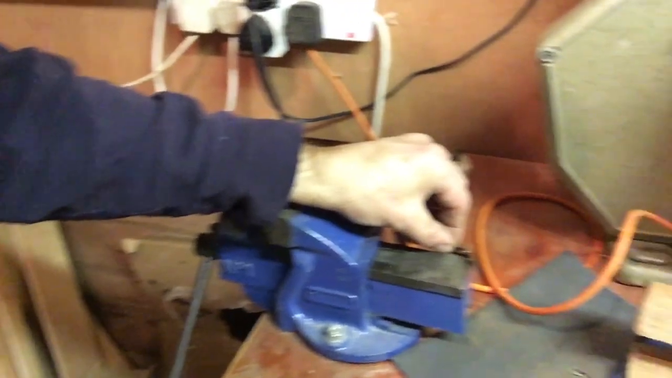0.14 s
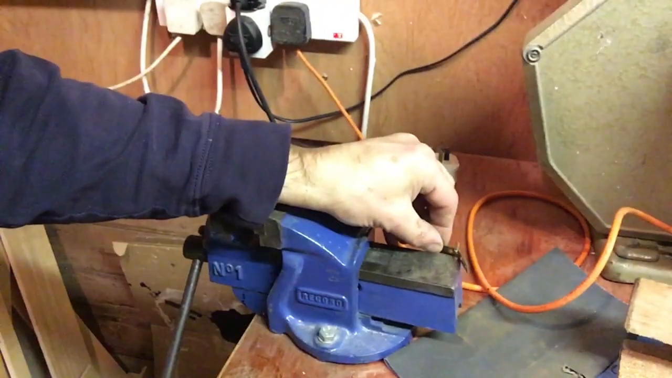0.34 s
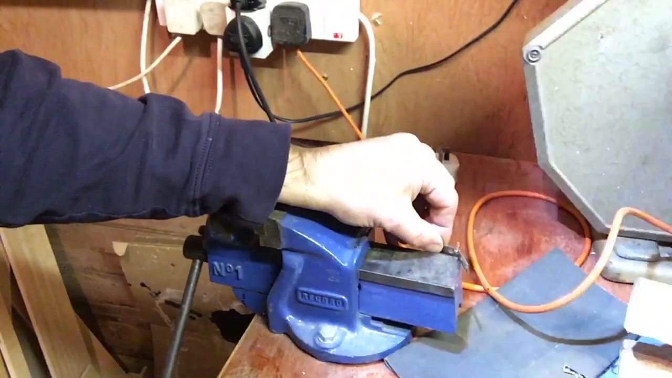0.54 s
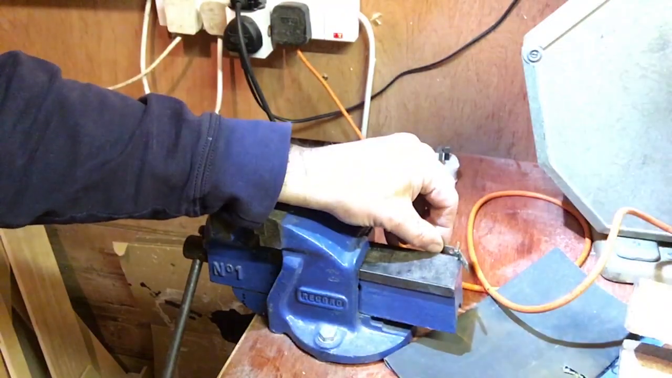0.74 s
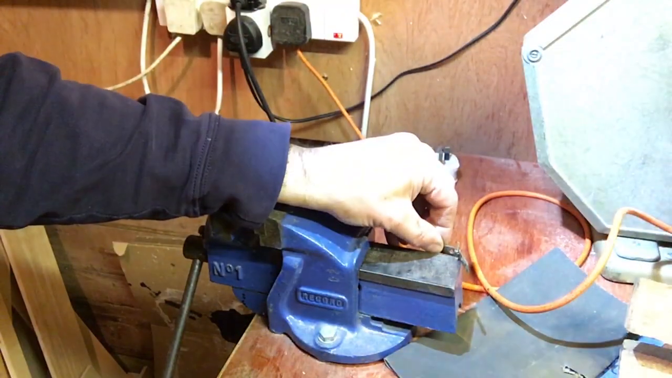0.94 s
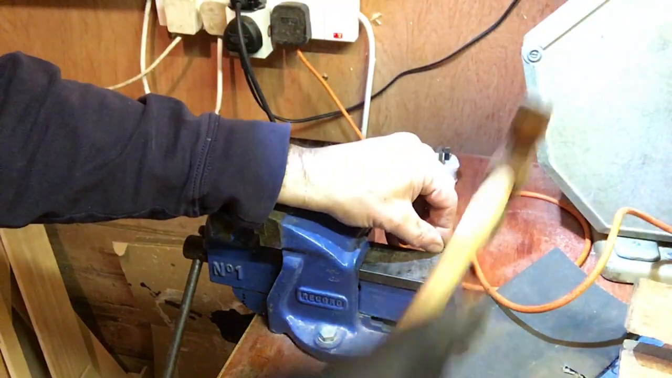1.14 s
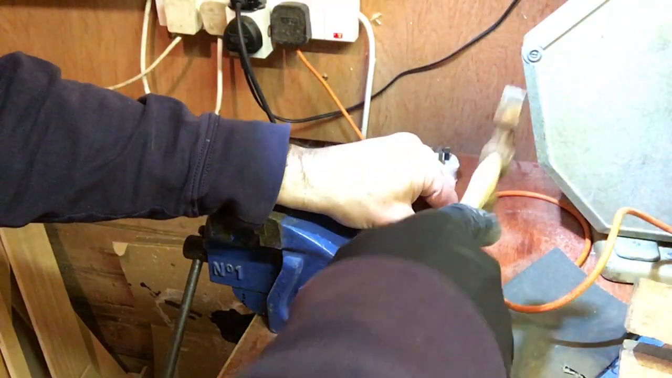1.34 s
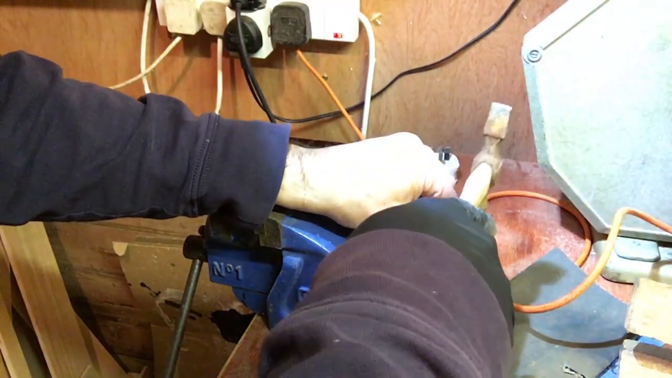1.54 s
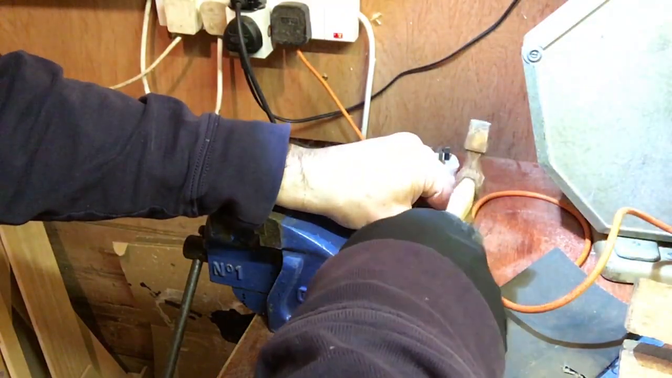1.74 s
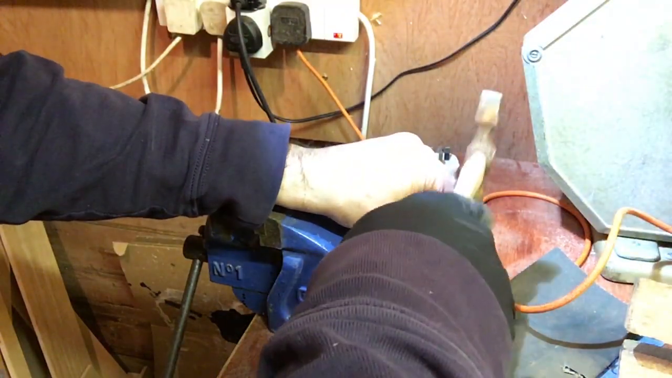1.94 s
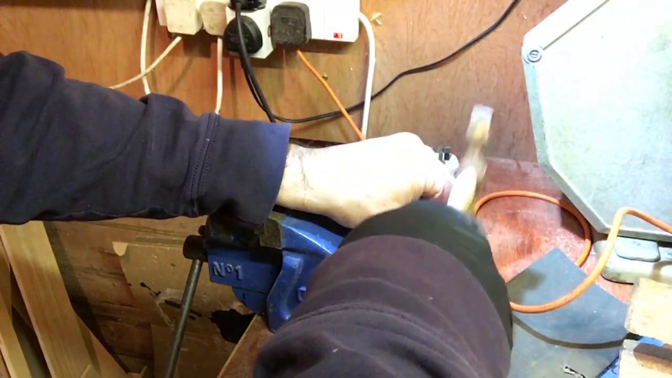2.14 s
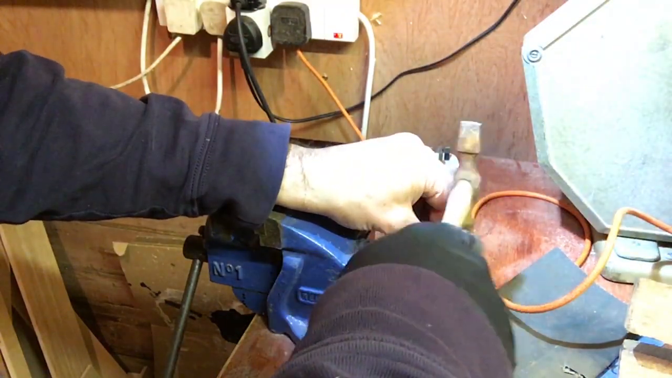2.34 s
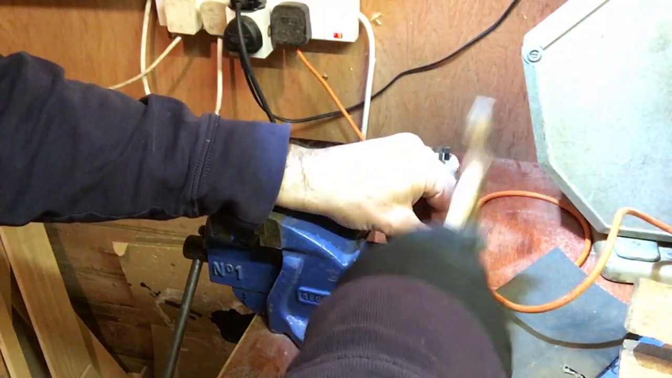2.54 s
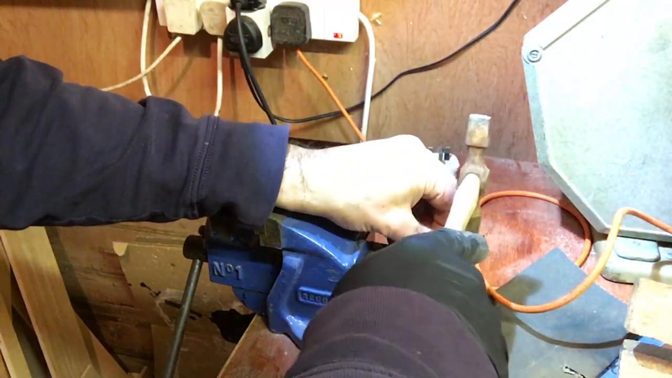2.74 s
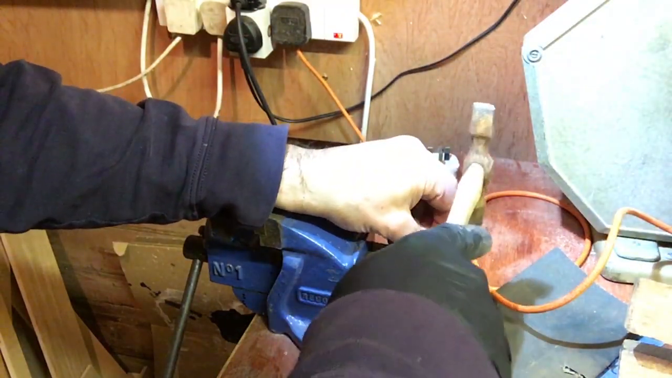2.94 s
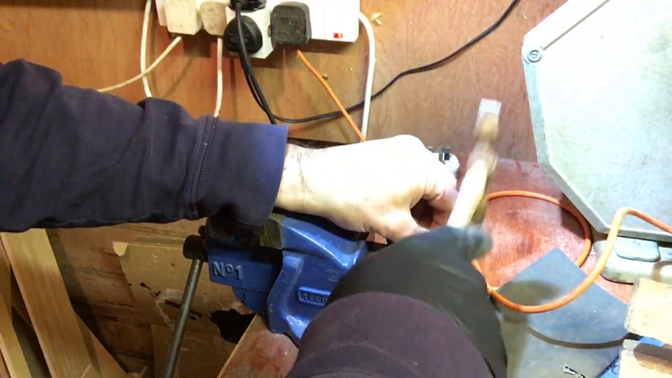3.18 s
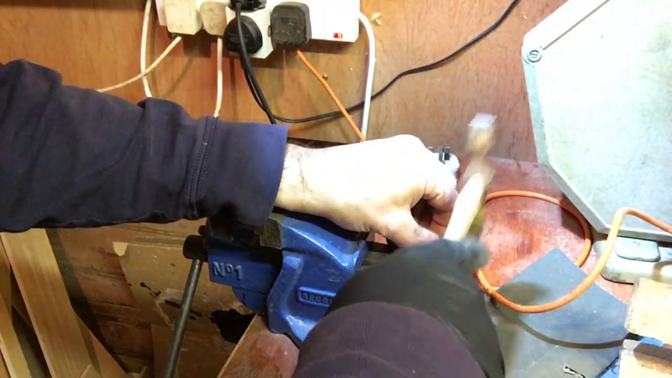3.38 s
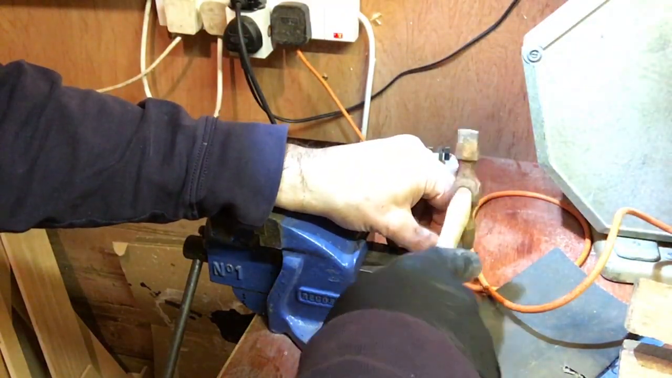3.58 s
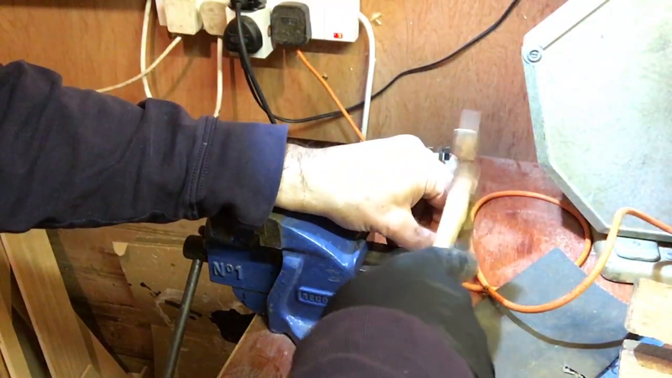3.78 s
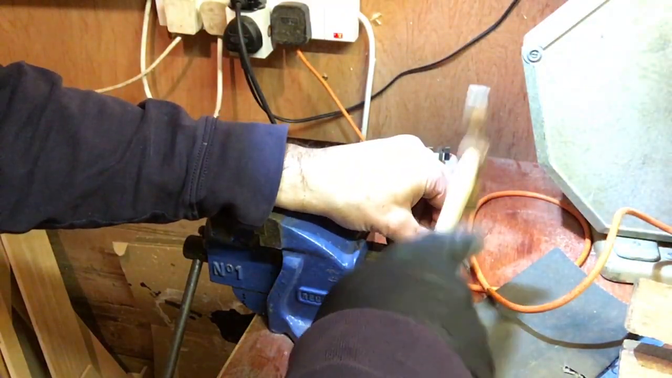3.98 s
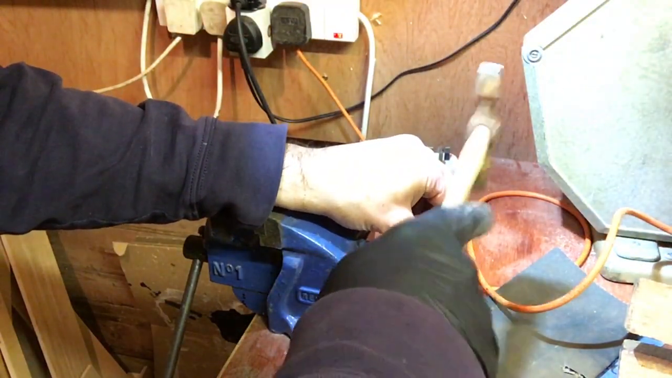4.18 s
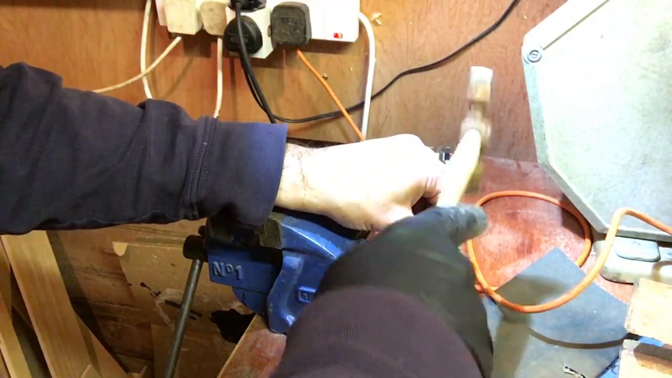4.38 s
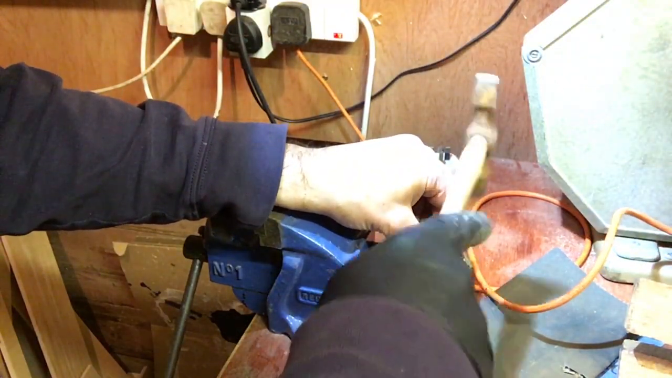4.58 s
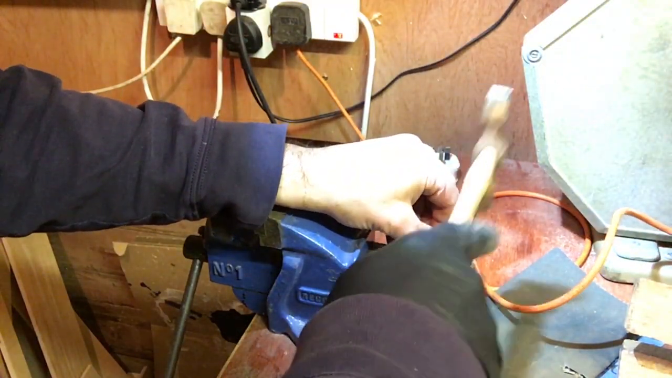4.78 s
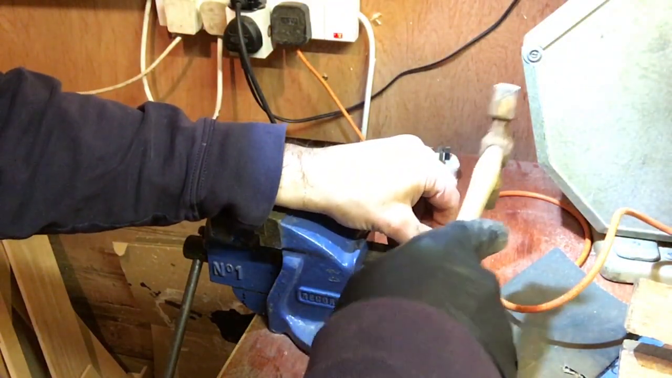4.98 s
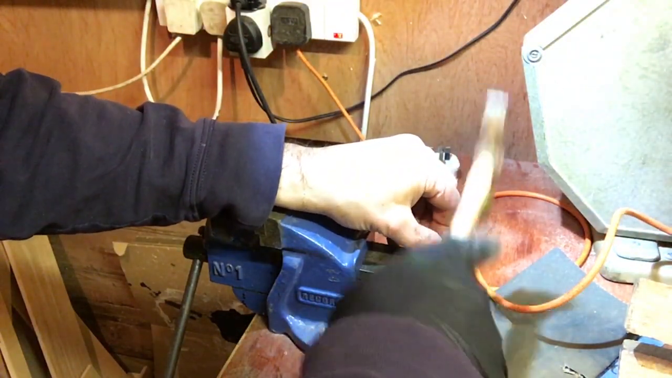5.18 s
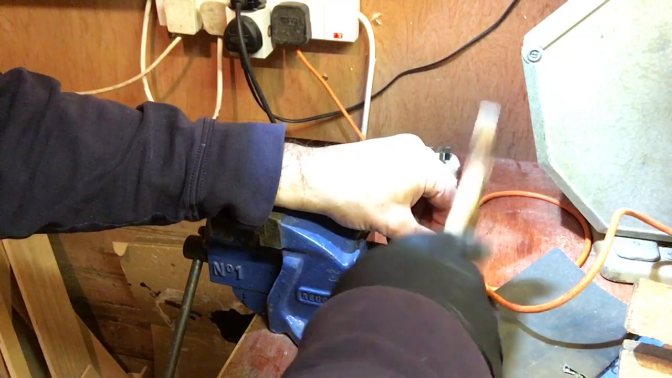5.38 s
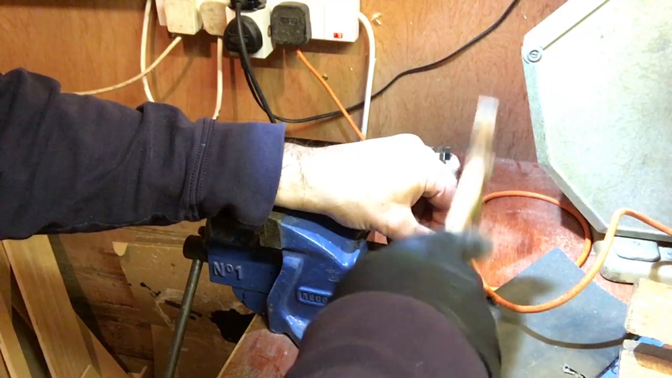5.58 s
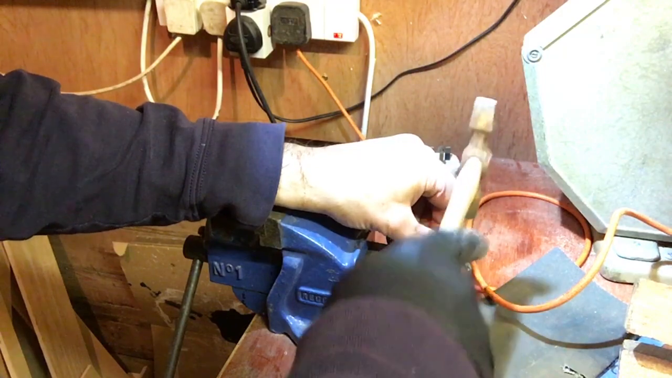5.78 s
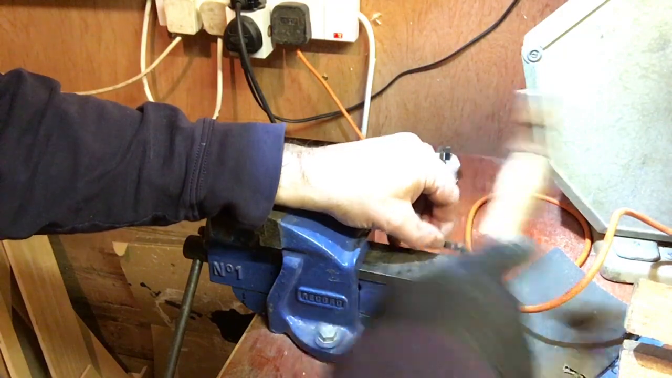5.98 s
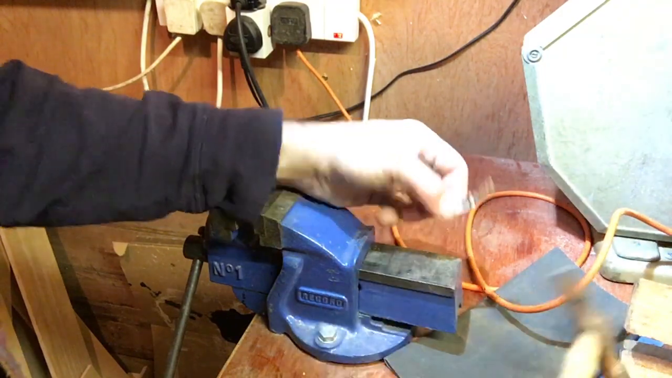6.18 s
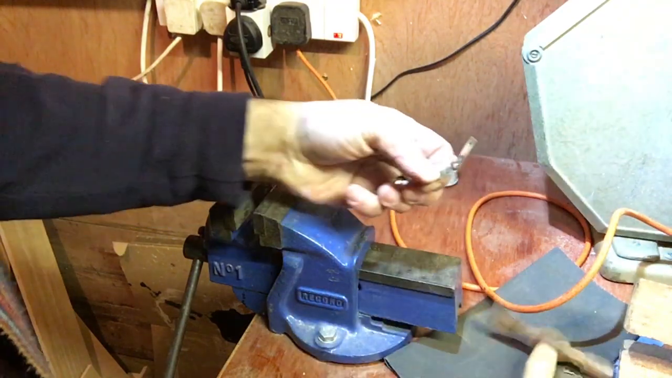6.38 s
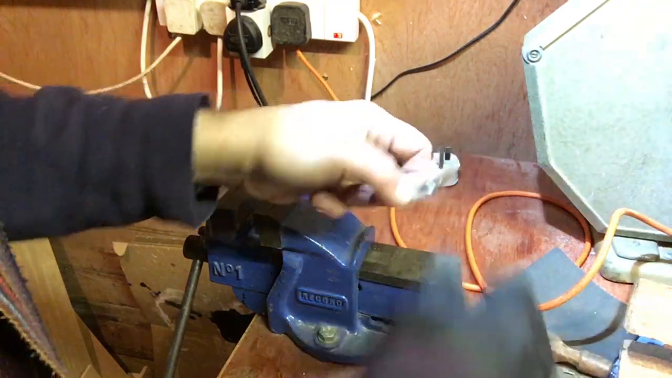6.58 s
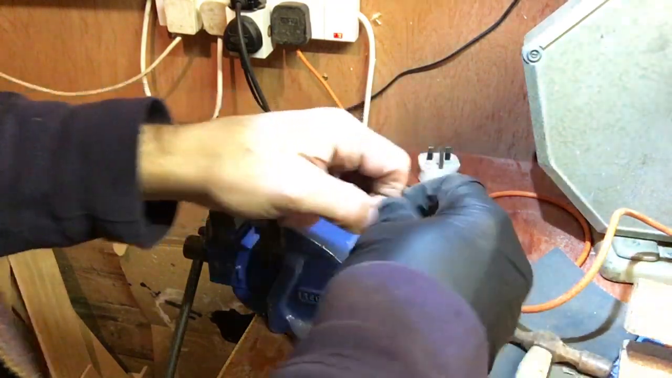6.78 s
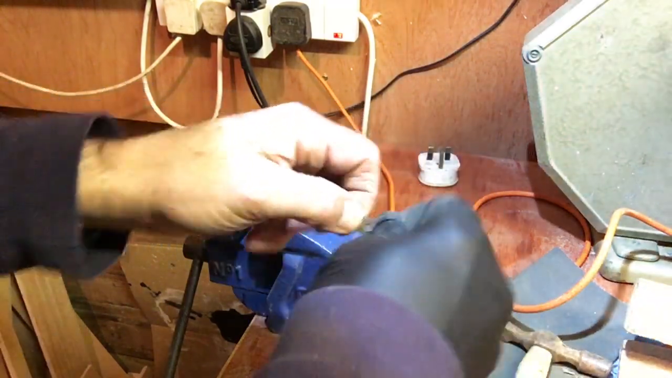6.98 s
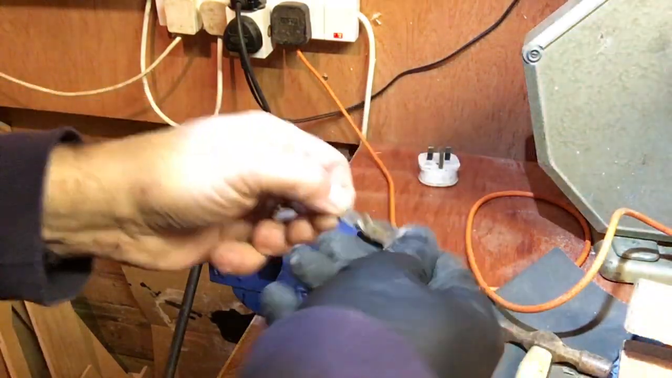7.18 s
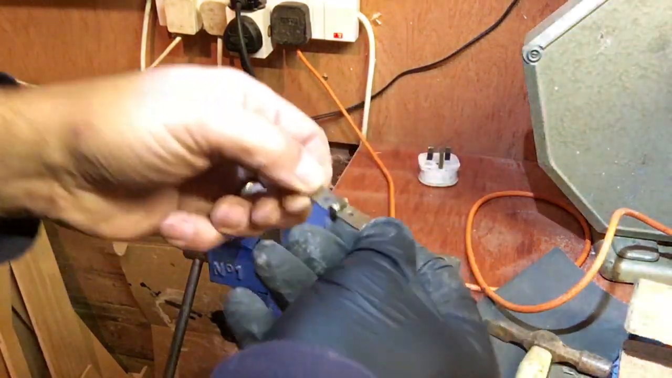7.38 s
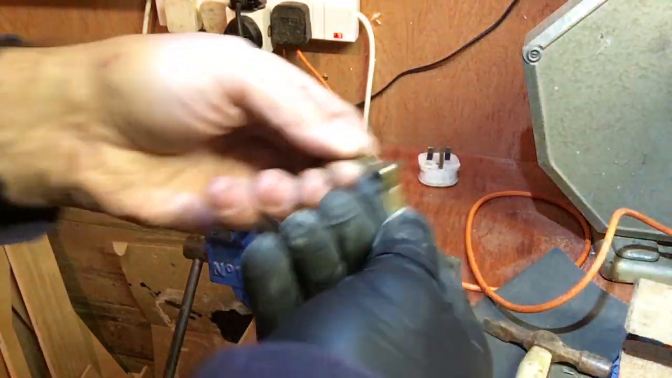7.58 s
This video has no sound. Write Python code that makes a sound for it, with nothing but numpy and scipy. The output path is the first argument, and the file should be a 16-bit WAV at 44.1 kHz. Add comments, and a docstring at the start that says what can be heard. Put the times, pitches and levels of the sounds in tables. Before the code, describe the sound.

Faint cloth rustle, then sharp metallic hammer blows on a vise-held pin, some overloading, followed by a bouncing wooden knock and soft scuffs.

```python
"""A dull hush fades first over a low room rumble that lasts throughout; sleeves and fingers rustle, one tick.
A small hammer then taps a brass hinge pin on an iron vise bolted to a wooden bench, in a small dry workshop.
The hammer is laid down and bounces on the bench; scuffs, ticks and two soft bumps follow.
Hits are click-driven modes plus dense decaying noise; rustle and room are noise shaped in bands.
The microphone is close, and the hard blows overload it."""
import sys
import numpy as np
from scipy import signal
from scipy.io import wavfile

SR = 44100
rng = np.random.default_rng(int(sys.argv[2]) if len(sys.argv) > 2 else 0)


def persist_wave(psi):
    """Save psi, clipped to +-1, as 16-bit WAV."""
    counts = np.round(np.clip(psi, -1, 1) * 32767).astype(np.int16)
    wavfile.write(sys.argv[1], SR, np.atleast_2d(counts).T)


N = 336232

# hammer on pin: t/s, blow level/dB; relative to the blow: bench thud/dB, vise ring/dB, pin clink/dB, bright edge/dB
BLOWS = [(1.726, -18.5, 8, -24.5, -16, -13), (2.039, -9, 9.5, -1, -7.5, -1),
         (2.304, -10.5, 8.5, -6, -19.5, -12.5), (2.561, -18, 11, -0.5, 7, 14.5),
         (3.04, -19, 11.5, -4, 6, 18), (3.296, -4.5, 3, -5.5, -12, -2.5), (3.545, 0, -0.5, -4.1, -7.5, 6),
         (3.778, -1, -0.5, 2, -3, -1), (4.008, -1, -1, 1.5, -4.5, 4), (4.224, -1, 0.5, 2.95, -2, 3.5),
         (4.438, -2, 1.5, 1.2, 0.5, 3.5), (4.627, -4.5, -4, 1.5, -3.5, 9),
         (5.095, -5.5, 5.5, -0.5, -6, 8.5), (5.315, 1, -1.5, 0, -3.5, 0.5), (5.506, -1, -0.5, 3, 5.5, 2.5),
         (5.687, -3.5, -0.5, 5.5, 9, 6), (5.843, -4, 1.5, 3, 7, 6)]
# hammer laid down and bouncing, then two soft bumps: t/s, knock level/dB; relative to it: thud, ring, clink, edge/dB
BOUNCES = [(6.374, -17, 15.5, -12.5, -15, 7), (6.437, -6, -6.5, -2, -22, -4.5),
           (6.515, -24, 19, 2.5, 1, -23), (6.552, -30, 12, 14, -29, -34), (6.586, -25.5, 8, 0.5, -41, -35),
           (7.536, -53.5, 24, 5.5, -2, -9), (7.555, -63.5, 10, -10, -8, -9)]
# centres of thud, blow, ring, clink and edge: f/Hz
SHARE_HZ = [180, 1000, 2700, 5500, 11500]
# modes of vise body and bench: f/Hz, relative level/dB, t60/s
VISE_MODES = [(107, -14, .16), (178, -17, .13), (251, -4, .18), (409, -8, .1), (453, -7, .1),
              (610, -4, .12), (648, -7, .1), (731, -7, .1), (803, -4, .1), (943, -6, .08), (1030, -7, .07),
              (1064, -4, .1), (1158, -5, .1), (1241, -6, .1), (1335, -8, .07), (1375, -8, .07),
              (1578, -9, .04), (1750, -12, .05), (2075, -15, .045), (2326, -14, .06)]
# modes of jaws, pin and hammer head: f/Hz, relative level/dB, t60/s
STEEL_MODES = [(2850, -12, .04), (2945, -6, .085), (3030, -7, .07), (3150, -13, .05), (3280, -12, .06),
               (3768, -17, .08), (4404, -19, .08), (4554, -19, .08), (4807, -18, .09), (5491, -21, .08),
               (5949, -24, .07), (6331, -24, .08), (6562, -25, .09), (6869, -25, .1), (7020, -27, .08),
               (8280, -36, .09), (9109, -41, .06), (10078, -40, .07), (11305, -41, .06), (12570, -37, .07),
               (13650, -39, .04), (13800, -38, .08), (15080, -44, .05)]
# modes of loose iron ringing on: f/Hz, relative level/dB, t60/s
LOOSE_IRON_MODES = [(379, -62, .6), (620, -68, .6), (940, -69, .8), (1010, -68, .9), (1060, -69, .7),
                    (1129, -67, .8)]
# modes of boards and handle: f/Hz, relative level/dB, t60/s
BENCH_MODES = [(188.3, -14, 0.08), (359.7, -1, 0.14), (606, -2.5, 0.19), (814, 0, 0.1), (1087, -7.5, .05),
               (1297, -8.5, 0.061), (1433, 8.5, .045), (1790, -9.5, 0.017), (2160, -19.5, .025),
               (2820, -8, 0.023), (4660, -23.5, 0.031), (6300, -39, .03)]
# dense response of bench and room: f/Hz, relative level per Hz/dB
CLATTER_SPECTRUM = [(30, -44), (60, -24.5), (110, -9), (200, -10.5), (260, -3), (600, -1.5), (1100, 0.5),
                    (1500, -4.5), (2300, -10), (3100, -14.5), (4500, -22.5), (6800, -25.5), (8000, -35),
                    (10000, -44), (13000, -40), (16500, -50)]
# decay of the dense response: f/Hz, t60/s
CLATTER_DECAY = [(50, 0.83), (130, 0.26), (350, 0.21), (920, 0.19), (2400, 0.16), (6400, 0.15), (15000, .1)]
# nail or pin ticks: t/s, level of the fundamental/dB, f/Hz, t60/s
TICKS = [(1.228, -35, 2550, 0.0022), (6.833, -34, 5640, 0.0019), (7.482, -53, 2880, .005)]
# overtones of a tick: frequency multiple, share of the fundamental
TICK_OVERTONES = [(1.45, -.7), (2.1, .5)]
# steady rubbing of sleeves, before tilt and cloth colour: t/s, level/dB
RUBBING = [(0, -72.5), (.65, -71), (.95, -66), (1.3, -65.5), (1.45, -68), (1.65, -91.5), (6.1, -89),
           (6.24, -68.5), (6.6, -72.5), (7.0, -67), (7.62, -65)]
# scuffs of fingers and cloth, before cloth colour: middle t/s, length/s, level at 5 kHz/dB, tilt/(dB/octave)
SCUFFS = [(0.223, .06, -70, 6), (0.351, 0.13, -64.5, 0), (0.516, 0.17, -76, -8), (0.698, .08, -69, 4),
          (0.878, 0.18, -66, 0.5), (0.988, 0.11, -67, 4), (1.134, 0.29, -68, -3), (6.435, 0.17, -47, -6.5),
          (6.738, 0.093, -55, -1.5), (6.85, 0.11, -61.5, 2), (6.992, 0.047, -55.5, 3),
          (7.164, .19, -56.5, 0.5), (7.338, 0.077, -67, -6), (7.532, .14, -69, -8.5)]
# colour of cloth noise: f/Hz, relative level per Hz/dB
CLOTH_SPECTRUM = [(300, -17.5), (700, -5.5), (1600, -1.5), (3500, 1.5), (6000, 0), (9000, -1),
                  (14000, -4.5), (16000, -6)]
# colour of room rumble and hiss: f/Hz, relative level per Hz/dB
ROOM_SPECTRUM = [(15, -25), (30, -8.5), (61, -1.5), (95, -12.5), (200, -19.5), (300, -19), (550, -27.5),
                 (1100, -30), (3000, -36), (7000, -42.5), (16000, -60.5)]
# edges of the dull hush band: low f/Hz, high f/Hz
HUSH_HZ = (363, 740)
THIRD_OCTAVE_EDGES_HZ = 30 * 2 ** np.arange(0, 9.2, 1 / 3)

HARD_DB = -9   # only blows above this shake the loose iron
BLOW_LOW_HZ = 58.3   # low cut of the hammer blows: keeps them free of sub-bass
KNOCK_LOW_HZ = 200   # the light hammer hardly moves the bench below this
CRACK_TILT_DB_PER_OCTAVE = 2   # the quick first part of a hit is brighter than its tail
RUBBING_TILT_DB_PER_OCTAVE = -1
SCUFF_EDGE_S = 0.044   # longest rise or fall
ROOM_DB = -63.5
HUSH_DB, HUSH_END_S, HUSH_FADE_DB_PER_S = -67.5, 0.23, 330
MIC_LOW_HZ, MIC_STEP_HZ, MIC_STEP_DB = 56, 6830, -5   # treble step applies above MIC_STEP_HZ
OVERLOAD, KNEE = 0.71, 5   # ceiling (full scale = 1), sharpness of the bend
CUTOFF_HZ = 16900


def from_db(db):
    """dB to amplitude gain."""
    return 10 ** (np.asarray(db) / 20)


def rms_one(x):
    """Scale to rms 1."""
    return x / np.sqrt(np.mean(x ** 2) + 1e-20)


def at_hz(points, hz):
    """Read a curve on a log-frequency axis."""
    curve_hz, values = np.array(points).T
    return np.interp(np.log(hz), np.log(curve_hz), values)


def drift(rate_hz):
    """Random knots of spread 1, joined by straight lines."""
    knots = rng.standard_normal(int(N / SR * rate_hz) + 2)
    return np.interp(np.arange(N) / SR * rate_hz, np.arange(len(knots)), knots)


def decay_per_sample(t60_s):
    """Gain per sample that falls 60 dB in t60."""
    return from_db(-60 / (t60_s * SR))


def above(x, hz):
    """Second-order high-pass."""
    return signal.sosfilt(signal.butter(2, hz, "high", fs=SR, output="sos"), x)


def ring(clicks, hz, t60_s):
    """Two-pole resonator: a unit click starts a decaying sine of height 1."""
    r = decay_per_sample(t60_s)
    w = 2 * np.pi * hz / SR
    return signal.lfilter([0, np.sin(w)], [1, -2 * r * np.cos(w), r * r], clicks + 1e-18)


def noise_bands(gain):
    """Third-octave bands of noise, each under the envelope gain(Hz)."""
    white = rng.standard_normal((2, N))   # neighbouring bands use different noise
    out = np.zeros(N)
    for k, (low, high) in enumerate(zip(THIRD_OCTAVE_EDGES_HZ, THIRD_OCTAVE_EDGES_HZ[1:])):
        sos = signal.butter(2, [low, high], "band", fs=SR, output="sos")
        out += signal.sosfilt(sos, white[k % 2] * gain(np.sqrt(low * high)))
    return out


def strike_clicks(hits, hz, scatter_db=0):
    """One click a hit, with the strength felt at one frequency."""
    t_s, level_db, thud_db, *bright_db = np.transpose(hits)
    shares_db = np.transpose([thud_db, 0 * t_s, *bright_db])
    felt_db = [np.interp(np.log(hz), np.log(SHARE_HZ), row) for row in shares_db]
    clicks = np.zeros(N)
    clicks[np.round(t_s * SR).astype(int)] = from_db(level_db + felt_db + scatter_db)
    return clicks


def struck_modes(hits, modes, level_db, rattle_db, rattle_t60_s, scatter_db):
    """Each hit rings each mode at its own strength; decaying chatter of the parts roughens the ring."""
    scatter = scatter_db * rng.standard_normal((len(hits), len(modes)))
    white = rng.standard_normal(N + 1000 * len(modes))
    out = np.zeros(N)
    for k, (hz, mode_db, t60_s) in enumerate(modes):
        clicks = strike_clicks(hits, hz, scatter[:, k]) + 1e-18
        chatter = signal.lfilter([from_db(rattle_db)], [1, -decay_per_sample(rattle_t60_s)], clicks)
        chatter_noise = chatter * white[1000 * k:][:N]
        drive = (-1) ** k * clicks + chatter_noise   # sign alternates from mode to mode
        out += from_db(mode_db + level_db) * ring(drive, hz, t60_s)
    return out


def clatter(hits, level_db, build_s, early_db, early_t60_s):
    """Modes too dense to tell apart: noise that builds fast and dies by band, with a quicker first part."""
    def envelope(hz):
        clicks = strike_clicks(hits, hz) + 1e-18
        tail = signal.lfilter([1], [1, -decay_per_sample(at_hz(CLATTER_DECAY, hz))], clicks)
        crack_db = early_db + CRACK_TILT_DB_PER_OCTAVE * np.log2(hz / 1000)
        crack = signal.lfilter([from_db(crack_db)], [1, -decay_per_sample(early_t60_s)], clicks)
        r = np.exp(-1 / (build_s * SR))
        built = signal.lfilter([1 - r], [1, -r], tail + crack)
        return from_db(at_hz(CLATTER_SPECTRUM, hz) + level_db) * built
    return noise_bands(envelope)


def hammer_on_pin():
    """Blows excite vise, steel parts and a dense response; hard ones also shake loose iron."""
    hard = [blow for blow in BLOWS if blow[1] > HARD_DB]
    vise = struck_modes(BLOWS, VISE_MODES, level_db=-16.5, rattle_db=-24, rattle_t60_s=0.12, scatter_db=2)
    steel = struck_modes(BLOWS, STEEL_MODES, level_db=-19, rattle_db=-21, rattle_t60_s=0.14, scatter_db=4)
    loose = struck_modes(hard, LOOSE_IRON_MODES, level_db=1.5, rattle_db=-30, rattle_t60_s=0.5, scatter_db=2.5)
    dense = clatter(BLOWS, level_db=4.5, build_s=0.00025, early_db=-0.5, early_t60_s=0.017)
    return above(vise + steel + loose + dense, BLOW_LOW_HZ)


def hammer_laid_down():
    """Bounces and soft bumps excite modes of boards and handle, and a dense response."""
    bench = struck_modes(BOUNCES, BENCH_MODES, level_db=-8, rattle_db=-28, rattle_t60_s=0.08, scatter_db=2)
    dense = clatter(BOUNCES, level_db=5.5, build_s=0.0003, early_db=2.5, early_t60_s=0.026)
    return above(bench + dense, KNOCK_LOW_HZ)


def ticks():
    """Tiny hard contacts, each a short ring with overtones."""
    out = np.zeros(N)
    for t_s, level_db, hz, t60_s in TICKS:
        click = np.zeros(N)
        click[round(t_s * SR)] = from_db(level_db)
        out += ring(click, hz, t60_s)
        for multiple, share in TICK_OVERTONES:
            out += share * ring(click, multiple * hz, t60_s)
    return out


def rustle(patchy_db):
    """Cloth and skin rubbing: a patchy noise bed, and scuffs that swell, hold and fade."""
    t = np.arange(N) / SR
    bed = from_db(np.interp(t, *np.transpose(RUBBING)))

    def envelope(hz):
        octaves = np.log2(hz / 5000)
        gain = bed * from_db(RUBBING_TILT_DB_PER_OCTAVE * octaves)
        for middle_s, length_s, level_db, tilt in SCUFFS:
            half_s = length_s / 2
            span = slice(int((middle_s - half_s) * SR), int((middle_s + half_s) * SR))
            to_edge_s = half_s - np.abs(t[span] - middle_s)
            swell = np.clip(to_edge_s / min(SCUFF_EDGE_S, half_s), 0, 1)
            gain[span] += from_db(level_db + tilt * octaves) * swell ** 2
        return gain * from_db(at_hz(CLOTH_SPECTRUM, hz) + patchy_db * drift(60))
    return noise_bands(envelope)


def room(patchy_db):
    """Continuous rumble and hiss with slight level drift per band, and a dull hush that fades early on."""
    floor = noise_bands(lambda hz: from_db(at_hz(ROOM_SPECTRUM, hz) + patchy_db * drift(21)))
    hush_sos = signal.butter(4, HUSH_HZ, "band", fs=SR, output="sos")
    hush = signal.sosfilt(hush_sos, rng.standard_normal(N))
    fade_db = HUSH_FADE_DB_PER_S * np.maximum(np.arange(N) / SR - HUSH_END_S, 0)
    return from_db(ROOM_DB) * rms_one(floor) + from_db(HUSH_DB - fade_db) * rms_one(hush)


def scene():
    """Sum of all sources at the microphone, one channel."""
    hits = hammer_on_pin() + hammer_laid_down()
    return (hits + ticks() + rustle(patchy_db=3) + room(patchy_db=1.5))[None]


def record(dry):
    """Microphone: cut deep bass, step treble down, flatten overloaded peaks, cut the top."""
    heard = above(dry, MIC_LOW_HZ)
    # odd-order halves add up without a notch
    low = signal.sosfilt(signal.butter(9, MIC_STEP_HZ, "low", fs=SR, output="sos"), heard)
    high = signal.sosfilt(signal.butter(9, MIC_STEP_HZ, "high", fs=SR, output="sos"), heard)
    heard = low + from_db(MIC_STEP_DB) * high
    flat = heard / (1 + np.abs(heard / OVERLOAD) ** KNEE) ** (1 / KNEE)
    return signal.sosfilt(signal.cheby2(12, 70, CUTOFF_HZ, fs=SR, output="sos"), flat)


dry = scene()
out = record(dry)
persist_wave(out)
```